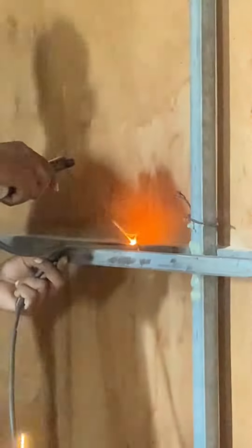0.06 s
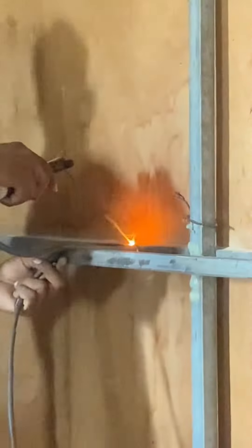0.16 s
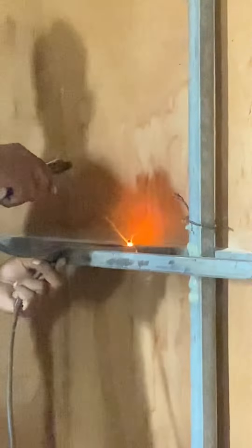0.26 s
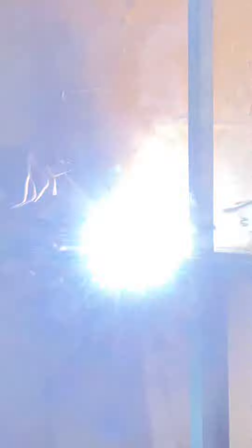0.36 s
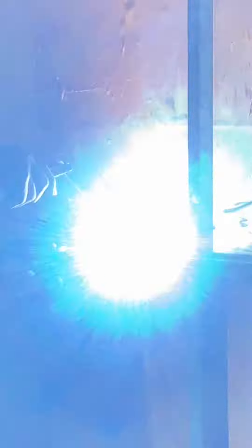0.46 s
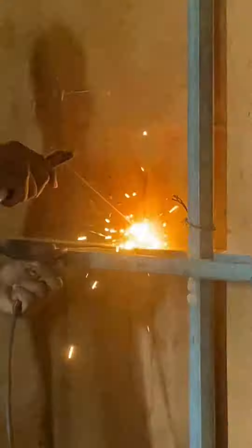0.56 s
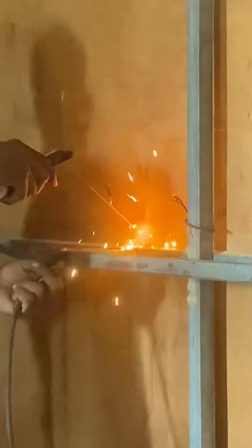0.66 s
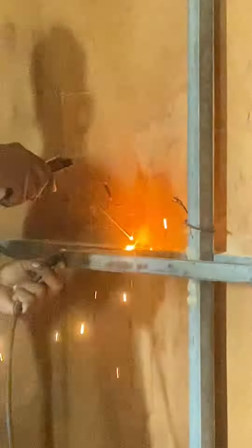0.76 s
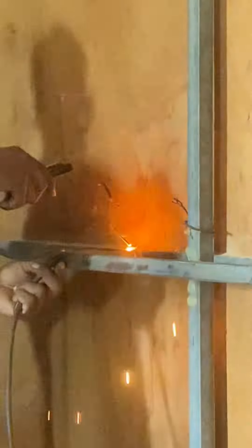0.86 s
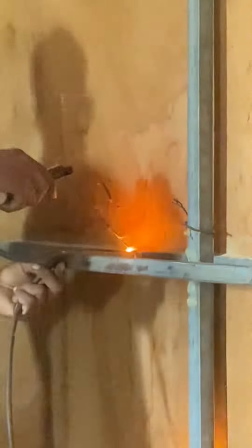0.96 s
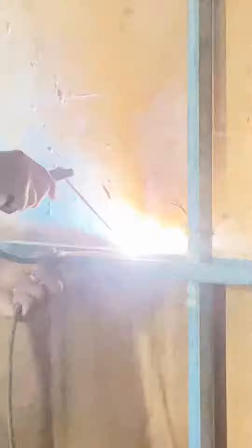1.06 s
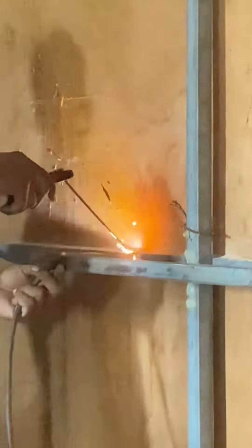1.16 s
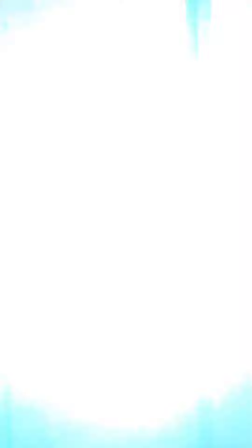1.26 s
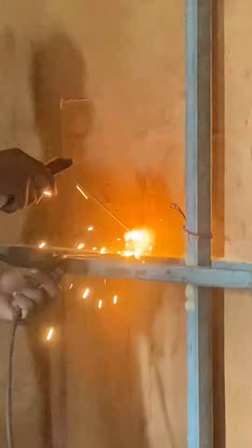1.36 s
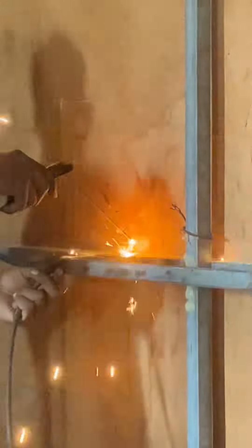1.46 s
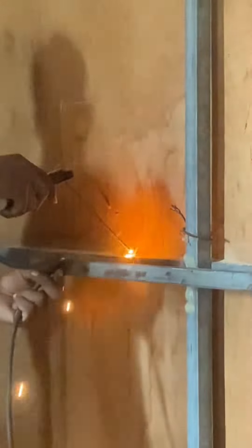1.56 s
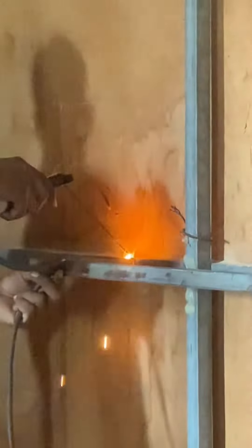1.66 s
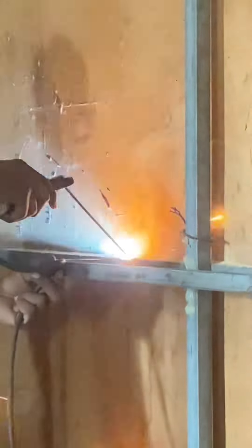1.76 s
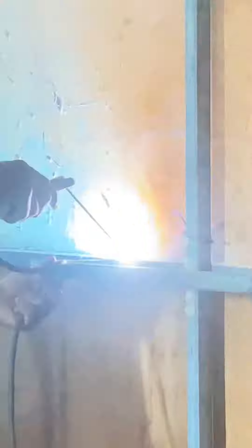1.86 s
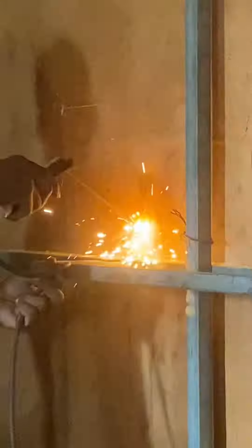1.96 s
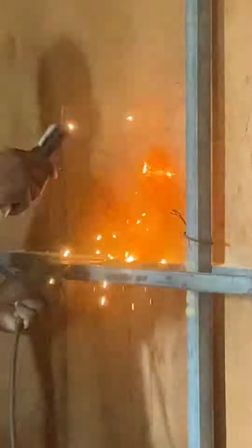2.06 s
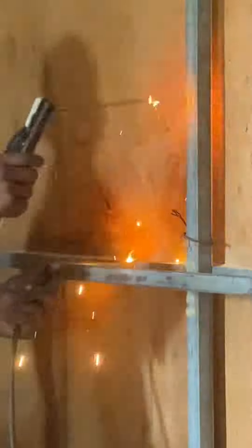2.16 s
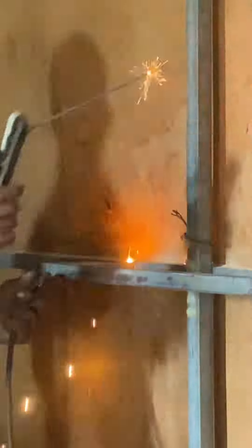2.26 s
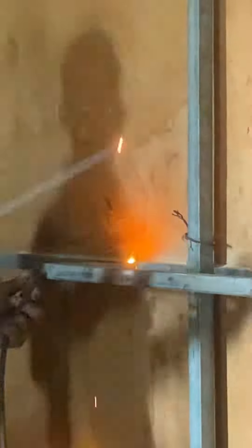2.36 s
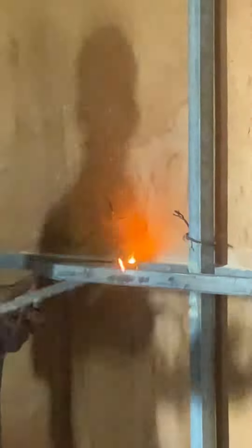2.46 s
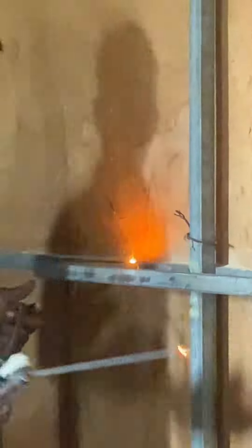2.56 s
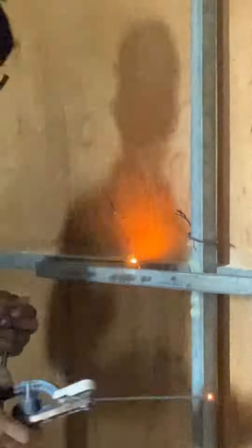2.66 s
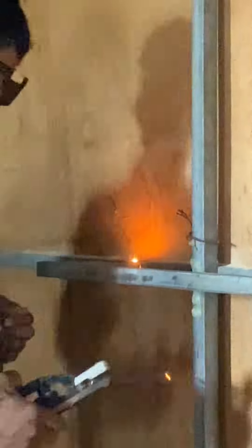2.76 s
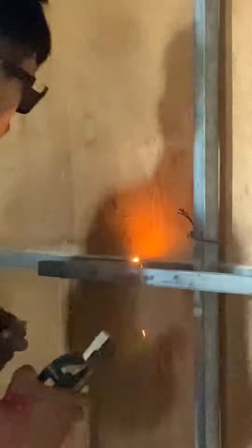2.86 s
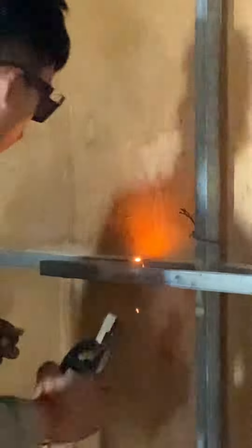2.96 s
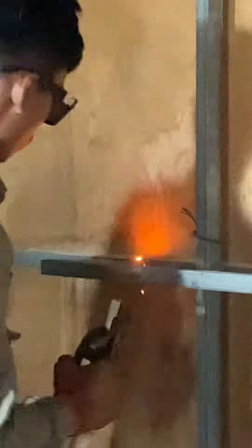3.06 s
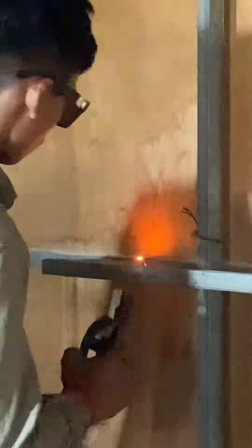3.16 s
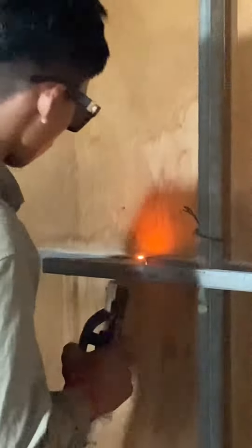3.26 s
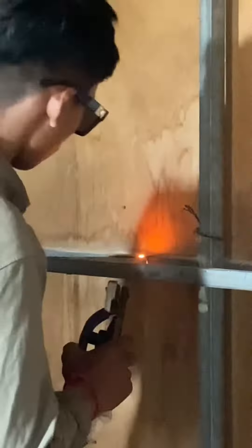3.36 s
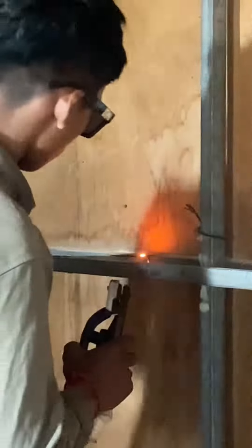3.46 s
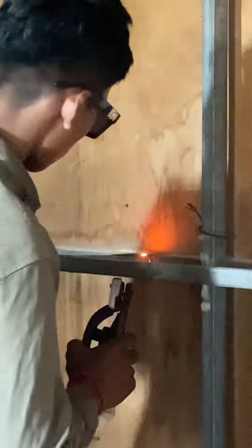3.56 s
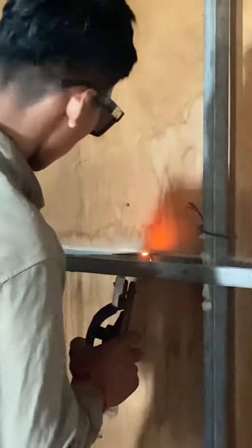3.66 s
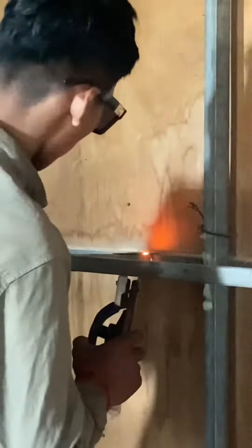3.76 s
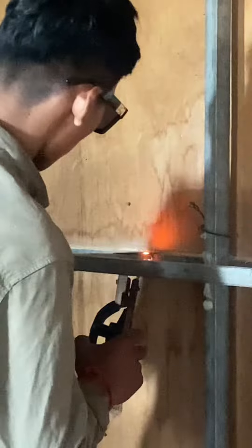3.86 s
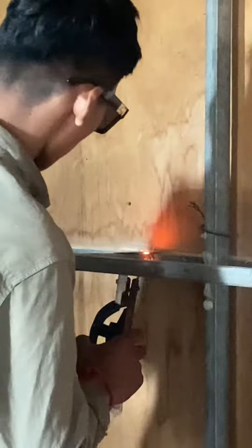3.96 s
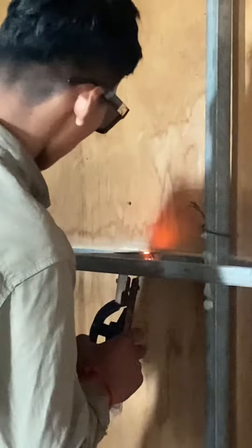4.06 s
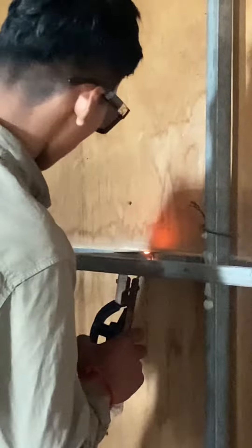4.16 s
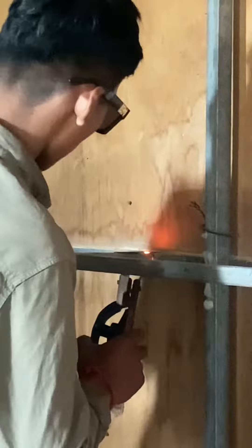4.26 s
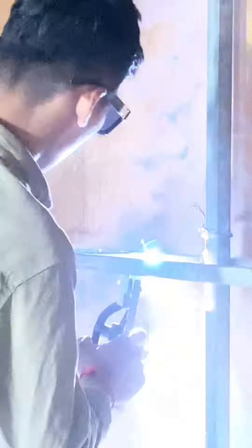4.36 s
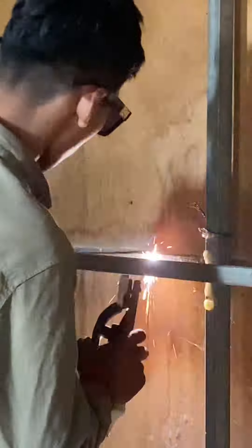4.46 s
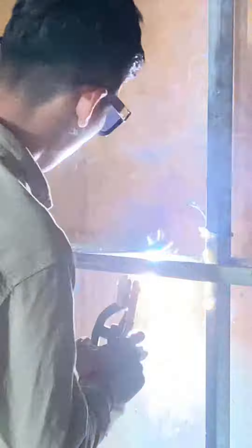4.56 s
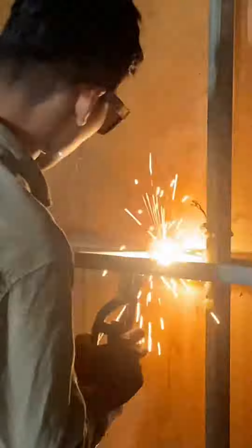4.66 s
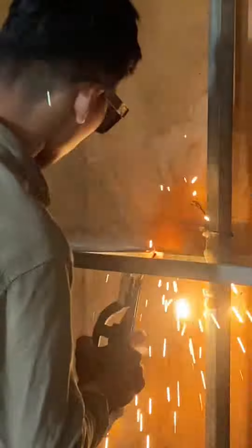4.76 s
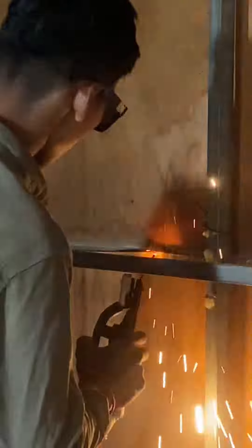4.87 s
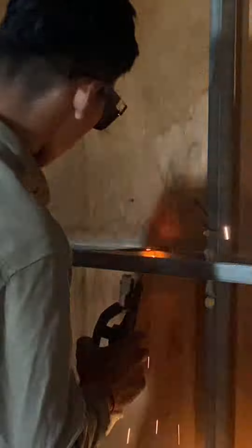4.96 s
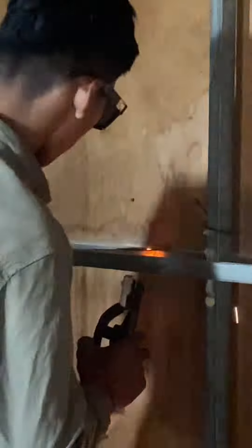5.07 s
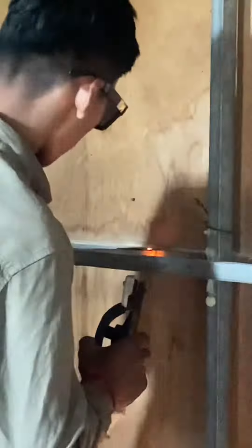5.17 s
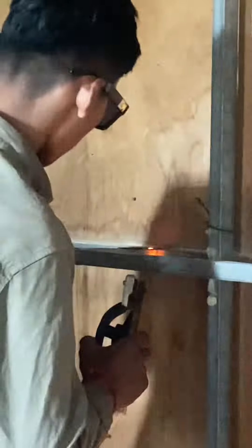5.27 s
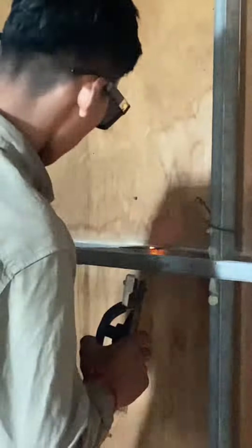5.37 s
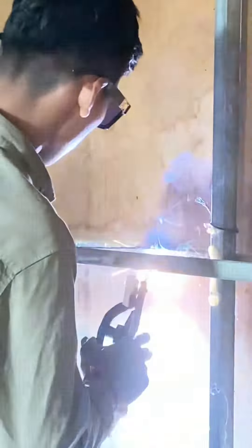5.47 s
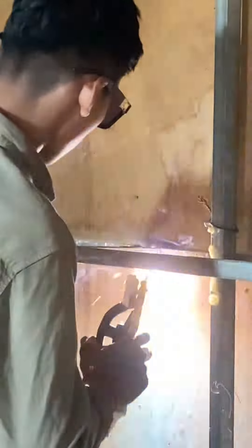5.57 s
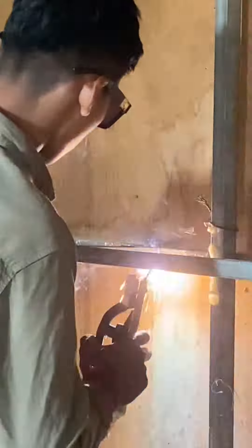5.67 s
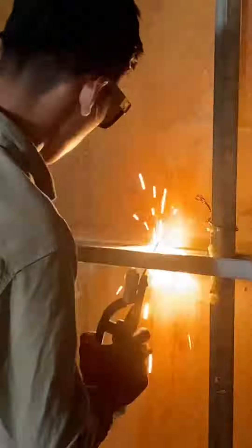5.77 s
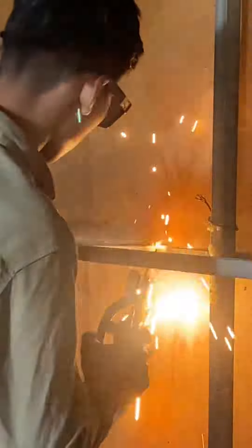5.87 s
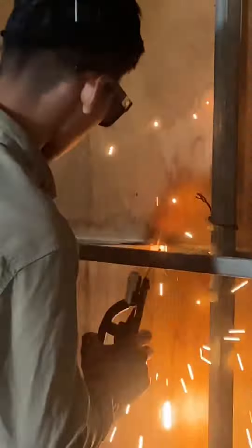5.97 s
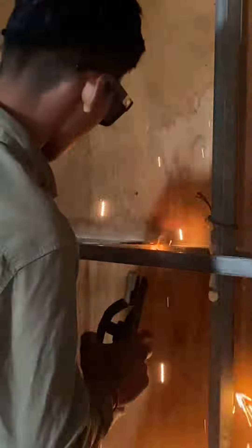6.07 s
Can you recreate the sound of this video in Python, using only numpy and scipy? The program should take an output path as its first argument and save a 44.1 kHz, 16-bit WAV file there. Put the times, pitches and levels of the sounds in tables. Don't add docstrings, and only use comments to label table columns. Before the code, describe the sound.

Close stick welding on a steel frame, captured on a phone in a reverberant hall. Brief crackling, sizzling bursts overlap far sheet metal crashes with a long washy ring. Next come soft heavy thumps, thin steel scrapes and a wavering squeak over a wobbling low hum. Late on, hard rod taps, a very sharp arc spit, one bright bar clang, then several more fizzing strikes with knocks and rubbing steel.

```python
import sys
import numpy as np
from scipy import signal
from scipy.fft import rfft, irfft
from scipy.io import wavfile
from scipy.ndimage import uniform_filter1d

SR = 44100
rng = np.random.default_rng(int(sys.argv[2]) if len(sys.argv) > 2 else 0)


def boost(x):
    u = np.asarray(x, float) / 20
    return 10 ** u


def inscribe(sig):
    pcm = np.round(np.clip(np.atleast_2d(sig).T, -1, 1) * 32767)
    wavfile.write(sys.argv[1], SR, pcm.astype(np.int16))


N = 269892
TIME = np.arange(N) / SR


def rms_one(x):
    return x / np.sqrt(np.mean(x ** 2) + 1e-20)


def in_time(rows):
    s, *columns = np.transpose(rows)
    return [np.interp(TIME, s, column) for column in columns]


def at_hz(points, hz):
    points_hz, values = np.transpose(points)
    return np.interp(np.log(hz), np.log(points_hz), values)


def drift(rate):
    r = np.exp(-80 * np.pi * rate / SR)
    steps = rng.standard_normal(N // 40 + 2002)
    slow = signal.lfilter([1], [1, -2 * r, r * r], steps)[2000:]
    return np.interp(np.arange(N) / 40, np.arange(len(slow)), rms_one(slow))


def butter(x, order, hz, kind="low"):
    return signal.sosfilt(signal.butter(order, hz, kind, fs=SR, output="sos"), x)


def resonate(x, hz, width_hz):
    r = np.exp(-np.pi * width_hz / SR)
    top = np.array([1, 0, -1]) * (1 - r * r) / 2
    return signal.lfilter(top, [1, -2 * r * np.cos(2 * np.pi * hz / SR), r * r], x)


def dying(s, t60, rise):
    out, start = np.zeros(N), int(s * SR) + 1
    t = np.arange(start, min(N, start + int(t60 * SR))) / SR - s
    out[start:start + len(t)] = (1 - np.exp(-t / max(rise, 1e-4))) * np.exp(-np.log(1000) * t / t60)
    return out


def tent(s, before, after):
    return np.interp(TIME, [s - abs(before), s, s + abs(after)], [0, 1, 0])


def coloured(tone, source, shape=lambda hz: 1):
    lowest, span = tone[0][0], tone[-1][0] / tone[0][0]
    edges = lowest * span ** np.linspace(0, 1, round(3.5 * np.log2(span)) + 1)
    centres = np.sqrt(edges[1:] * edges[:-1])
    gains = boost(at_hz(tone, centres))
    gains = gains / np.sqrt(np.sum(gains ** 2 * np.diff(edges)) * 2 / SR)
    out = 0
    for k, hz in enumerate(centres):
        band = butter(source[k % len(source)], 2, edges[k:k + 2], "band")
        out = out + gains[k] * shape(hz) * band
    return out


# strike in seconds, length in seconds,
# level at the strike in dB, change in dB while it lasts.
ARC_BURNS = [(0.282, 0.095, -37.5, -9), (0.376, 0.013, -39, -1), (0.411, 0.28, -33.5, -24.5),
             (1.055, 0.02, -44, -4), (1.082, 0.081, -52, 9), (1.163, 0.28, -35, -34),
             (1.483, .024, -29, -22), (1.711, 0.089, -44, 7), (1.81, 0.078, -47, 16.5),
             (1.911, 0.098, -46, -12), (4.121, 0.2, -47, -10), (4.321, 0.096, -28, -5.5),
             (4.406, 0.11, -34, -2), (4.522, 0.039, -38, 13.5), (4.96, .05, -56, -9),
             (5.032, 0.041, -54, -15), (5.126, .05, -61, -4), (5.411, .16, -32, -4),
             (5.574, 0.098, -37.5, 6.5), (5.688, 0.024, -28, -7), (5.72, 0.16, -43, -12),
             (5.859, 0.076, -46.5, -7)]
# start in seconds, peak in dB, snap over the peak in dB.
ARC_SPITS = [(0.376, -27, 7), (0.403, -18, 4), (0.412, -19.5, 15), (0.4434, -35, 7), (1.0507, -31, 11),
             (1.475, -35, 15), (1.713, -38, 13), (1.741, -25, 7), (1.7984, -36, -2), (3.8395, -32, 9.5),
             (4.114, -31, 6), (4.315, -4, -12), (4.448, -23, 21), (4.5438, -26, 7), (5.4049, -9.5, -1),
             (5.497, -21, 13), (5.565, -22, 16), (5.648, -15.5, 11), (5.68, -19.5, 22.5)]
# frequency in Hz, level in dB per Hz.
ARC_COLOUR = [(900, 6.5), (2000, -0.5), (4500, 1), (7000, 4.5), (10000, -2.5), (13000, -1), (15000, -7),
              (17000, -2)]


def arc():
    strike_db_per_s, quench_db_per_s = 2500., 805
    burns = []
    for s, length, db, change_db in ARC_BURNS:
        burning_db = db + change_db * np.clip((TIME - s) / length, 0, 1)
        before_db = strike_db_per_s * np.maximum(s - TIME, 0)
        after_db = quench_db_per_s * np.maximum(TIME - s - length, 0)
        burns.append(burning_db - before_db - after_db)
    level = uniform_filter1d(boost(np.max(burns, axis=0)), size=60)

    sizes = boost(1.8 * np.minimum(rng.exponential(1, N), 5)) * rng.choice([-1, 1], N)
    grains = rms_one(sizes * (rng.random(N) < 2500. / SR))
    hiss = rng.standard_normal((2, N))
    burn = (.5 * grains + 0.89 * hiss) * level * boost(5.5 + 2.0 * drift(24))
    snaps = np.zeros(N)
    for s, db, snap_db in ARC_SPITS:
        burn = burn + boost(db - 6.0) * dying(s - .001, 0.021, 0.00014) * hiss
        snaps += boost(db + snap_db) * dying(s - .0002, .0025, .00005) * np.sign(hiss[0])
    return coloured(ARC_COLOUR, burn) + butter(snaps, 2, 6000., "high")


# start in seconds, level in dB, rise in seconds,
# brightness in dB per octave, ring length as a share of the hall's.
SHEET_CRASHES = [(0.226, -16, 0.017, 1, 1.16), (.28, -12, 0.081, 0, 0.71), (0.502, -17.5, 0.043, -1, 0.93),
                 (1.146, -12, 0.012, 1.5, 0.92), (1.19, -18, 0.069, 0, 3.4), (1.424, -28, 0.005, -2, 0.6),
                 (0.792, -30.5, 0.005, -4, 0.45), (1.473, -20, 0.0059, 0.5, 1.8),
                 (1.50, -22.5, 0.024, 2, 2.8), (1.523, -19.5, 0.0061, -2, 0.49),
                 (1.586, -19, 0.0044, -4, 0.5), (1.645, -24, 0.005, -3, 0.4), (1.831, -38, 0.005, 4, 0.27)]
# frequency in Hz, level in dB per Hz.
WASH_COLOUR = [(180, -5), (350, 0.5), (630, -6), (720, 0.5), (1050, -2), (1250, -7), (2000, -17.5),
               (3400, -10.5), (6000, -17.5), (8500, -22.5), (11000, -36.5), (12800, -29)]
# frequency in Hz, time in seconds to fall 60 dB.
WASH_T60 = [(250, 0.26), (900, 1.69), (2500, 1.71), (5000, 0.37), (8000, 0.39), (12000, 0.55)]
# frequency in Hz, level in dB over the wash.
SHEET_MODES = [(335, -5), (452, -1), (731, -1), (767, 2.5), (823, 2), (890, 1.5), (964, 3), (1007, 1.5),
               (1041, 5), (1134, -26), (1347, 9.5), (1416, 5), (1545, 7.5), (1570, 7.5), (1810, 10),
               (1949, 8.5), (2306, 2), (2433, -26), (2713, 5), (2800, -13), (3004, 4), (3165, 2.5),
               (3420, 3), (3607, -5)]
# end in seconds, start in seconds,
# extra fall in dB per second.
SHEET_DAMPS = [
    (1.0, 0.79, 7),
    (7.0, 1.59, 9.5),
]


def crashes():
    def energy(hz):
        tilt = np.log2(hz / 1000)
        slow = max((1000 / hz) ** 0.17, .1)
        power = 0
        for s, db, rise, bright, share in SHEET_CRASHES:
            if hz >= 7000:
                share = min(share, 2.2)
            envelope = dying(s, share * at_hz(WASH_T60, hz), rise * slow)
            power = power + (boost(db + bright * tilt) * envelope) ** 2
        return np.sqrt(power)

    damp_db = 0
    for until, s, db in SHEET_DAMPS:
        damp_db = damp_db - db * np.maximum(TIME - s, 0) * (TIME < until + .14)
    damp = boost(damp_db)

    def wash_level(hz):
        grip = 1 + .7 * abs(np.log2(hz / 950))
        return energy(hz) * damp ** grip * boost(2.47 * drift(10.3))

    white = rng.standard_normal((3, N))
    clatter_per_s, clatter_share = 900., 0.55
    ticks = rms_one(white[2] ** 3 * (np.abs(white[1]) < 1.25 * clatter_per_s / SR))
    source = np.sqrt(1 - clatter_share ** 2) * white[:2] + clatter_share * ticks
    wash = coloured(WASH_COLOUR, source, wash_level)

    low = boost(-7.0) * energy(570.0)
    high = boost(-11.0) * energy(1200.0) * damp ** 2
    rings = np.zeros(N)
    for hz, db in SHEET_MODES:
        width_hz = 8 + .004 * max(hz - 1100, 0)
        mode = rms_one(resonate(white[2], hz, width_hz))
        rings += boost(at_hz(WASH_COLOUR, hz) + db) * mode * (low if hz < 1200 else high)
    return wash + butter(rings, 4, 4500.)


# start in
# seconds, peak in dB, pitch in Hz, time in seconds to fall 60 dB.
PADDED_THUDS = [(0.433, -13, 174, 0.09), (0.444, -11, 73, 0.21), (0.969, -15.5, 197, 0.11),
                (2.03, -18, 510, 0.32), (2.056, -22, 520, 0.14), (2.071, -15, 547, 0.11),
                (2.09, -13.5, 435, 0.19), (2.19, -16, 500, 0.29), (2.61, -20, 572, 0.85),
                (2.65, -23, 631, 0.37), (2.955, -4, 67.7, 0.11), (3.019, -7.5, 594, 0.041),
                (3.021, -8, 278, 0.056), (3.018, -11, 113, 0.13), (3.838, -6, 44.8, 0.095),
                (4.573, -15.5, 120, 0.48), (4.602, -20, 198, 0.66), (4.6, -17, 550, 0.17),
                (4.625, -18.5, 145, 0.55), (4.655, -20, 169, 0.3), (4.687, -21, 307, 0.12),
                (4.76, -16, 150, 0.16), (4.43, -16.5, 357, 0.14), (4.36, -14, 400, 0.16),
                (4.469, -19, 424, 0.093)]
# start in seconds, peak in dB, pitch in Hz,
# time in seconds to fall 60 dB.
ROD_TAPS = [(4.252, -12.5, 323, 0.29), (4.275, -7.5, 258.3, 0.1), (4.298, -17, 650, 0.1),
            (4.261, -20, 1450, 0.052), (4.257, -12.5, 850, 0.083), (4.266, -16, 565, 0.1),
            (4.47, -14, 800, 0.05), (2.071, -15, 800, 0.046), (4.255, -8.5, 683, 0.096),
            (4.28, -10, 508, 0.14), (4.352, -11.5, 646, 0.17), (4.462, -11.5, 615, 0.067),
            (4.258, -11.5, 1000, 0.098), (4.256, -24, 1900, 0.05), (4.283, -28, 1900, 0.041),
            (4.315, -19, 1730, .06), (4.345, -18, 1700, .08), (4.362, -17, 790, 0.041),
            (4.466, -18, 1100, 0.053), (4.487, -14.5, 706, .08), (4.546, -15, 1180, 0.056),
            (4.562, -19, 3000, 0.066), (5.40, -25, 570, 0.12), (5.629, -21.5, 1540, 0.076),
            (5.69, -14, 548.4, 0.11), (5.703, -8.5, 262, 0.087)]


def knocks():
    out, white = np.zeros(N), rng.standard_normal(N)
    edge = rms_one(butter(butter(white, 4, [300, 3000], "band"), 1, 800.))
    # its edge in dB, its share of clear note
    for blows, edge_db, pure in [(PADDED_THUDS, -12, 0.53), (ROD_TAPS, -8, 0.54)]:
        for s, db, hz, t60 in blows:
            rise = .5 / hz
            since = np.maximum(TIME - s, 0)
            sag = 0.67 * (1 - np.exp(-since * hz / 2.8))
            note = np.sin(2 * np.pi * (hz * since + sag)) * dying(s, .35 * t60, rise)
            puff = rms_one(resonate(resonate(white, hz, 0.21 * hz), hz, 0.61 * hz))
            body = puff * dying(s, t60, rise)
            hard = boost(edge_db) * edge * dying(s, 0.25 * t60, 0.0013)
            out += boost(db) * (pure * note + 0.5 * body + .5 * hard)
    return out


# frequency in Hz, level in dB, time in seconds to fall 60 dB.
BAR_MODES = [(118.9, -12, 1.4), (1170, 5.5, 0.19), (1610, 0, 0.11), (1900, -0.5, 0.29), (2216, -10, 0.56),
             (2690, -4, 0.28), (3220, 1.5, 0.16), (3500, -10, 1.2), (3120, -33, 0.54), (3930, -15, 0.14),
             (4000, -3, 0.17), (4430, -9, 0.65), (4560, -18, 0.43), (5080, -0.5, 0.2), (5400, -16, 0.34),
             (7100, -42, 0.43)]
# delay after the blow in seconds, level in dB.
BAR_BOUNCES = [
    (0.009, 1),
    (0.023, -5),
    (0.036, -15),
    (0.047, -20),
]


def clang():
    blow_s, crack_t60_s = 4.587, .5
    white = rng.standard_normal((2, N))
    modes, rattle = np.zeros(N), np.zeros(N)
    for hz, db, t60 in BAR_MODES:
        modes += boost(db - 5.5) * rms_one(resonate(white[0], hz, 10.5)) * dying(blow_s, t60, 0.00033)
    for delay, db in BAR_BOUNCES:
        rattle += boost(db) * dying(blow_s + delay, 0.034, 0.0002)
    crack_tone = [(300, 18), (900, -38), (1200, 2.0), (2400, -1.5), (3500, 3.5), (4600, 1.5),
                  (5800, -10.5), (6600, -26), (7500, -45)]

    def crack_level(hz):
        return dying(blow_s, crack_t60_s * (3000 / hz) ** 0.17, 0.00019) + rattle

    return boost(-18) * (modes + coloured(crack_tone, white, crack_level))


# start, peak and end in
# seconds, pitch in Hz, level in dB.
STEEL_RASPS = [(1.77, 2.26, 2.53, 5300, -38.5), (2.28, 2.5, 3.4, 5200, -45.5),
               (2.1, 2.12, 2.62, 5730, -37.5), (1.96, 2.18, 2.62, 8500, -43), (2.6, 2.9, 4.7, 679, -38),
               (5.58, 5.64, 5.72, 1490, -32), (5.7, 5.798, 5.9, 164, -29.5), (2.76, 4.7, 11, 161, -39.5)]
# start, peak and end in
# seconds, pitch in Hz, level in dB.
GROANS_AND_ARC_TONES = [(2.58, 2.7, 2.85, 3550, -45), (2.98, 3.18, 3.4, 910, -39), (2.81, 3.02, 3.35, 740, -30),
                        (2.62, 3.5, 3.77, 130, -34), (5.47, 5.64, 5.68, 2550, -43), (5.41, 5.44, 6.2, 4480, -40),
                        (5.55, 5.58, 5.61, 3550, -39), (5.63, 5.68, 5.695, 4700, -36),
                        (2.08, 2.26, 2.55, 5200, -40)]
# start, peak and end in seconds, pitch in Hz, level in dB.
SQUEALS_AND_RINGS = [(2.57, 2.634, 2.9, 2250, -42), (2.6, 2.72, 2.82, 3560, -52), (2.87, 2.96, 3.25, 4860, -47),
                     (2.02, 2.13, 2.3, 3390, -45), (2.1, 2.27, 2.6, 5150, -42), (1.7, 1.9, 2.7, 1041, -36),
                     (1.7, 1.9, 2.6, 1347, -40), (1.65, 1.8, 2.1, 900, -33), (1.75, 1.9, 2.3, 1810, -43),
                     (5.4, 5.66, 5.8, 4700, -41), (3.1, 3.2, 3.4, 2950, -47)]


def scrapes():
    grit = rng.standard_normal(N) * boost(.8 * drift(34))
    out = np.zeros(N)
    for rows, width in [(STEEL_RASPS, 0.15), (GROANS_AND_ARC_TONES, 0.075), (SQUEALS_AND_RINGS, 0.016)]:
        for start, peak, end, hz, db in rows:
            rub = rms_one(resonate(resonate(grit, hz, width * hz), hz, width * hz))
            out += boost(db) * tent(peak, peak - start, end - peak) * rub
    return out


# time in seconds, pitch in Hz, level in dB rms.
SQUEAK_NOTE = [(2.86, 2990, -62), (2.93, 3010, -48), (3.0, 3000, -45), (3.05, 2920, -42.5),
               (3.09, 2980, -43.5), (3.13, 3000, -44), (3.15, 2960, -62)]


def squeak():
    hz, level_db = in_time(SQUEAK_NOTE)
    turn = 2 * np.pi * np.cumsum(hz * (1 + .004 * drift(60.))) / SR
    return np.sqrt(2) * boost(level_db + 2.5 * drift(25.)) * np.sin(turn)


# time in seconds, pitch in Hz, level in dB rms.
DRONE_SPEED = [(0.0, 54.5, -18), (0.34, 54.6, -30), (0.46, 57.3, -26), (0.6, 54.75, -29.5),
               (1.46, 55.33, -29), (1.7, 55.2, -24), (2.18, 55.06, -28), (2.74, 55.2, -29.5),
               (2.95, 53.5, -27.5), (3.75, 53.58, -23.5), (3.92, 56.5, -17), (4.07, 58.5, -27),
               (4.55, 58.43, -21), (5.03, 55.75, -24), (5.36, 55, -23.5), (5.6, 56, -31.5),
               (5.9, 57.7, -23.5), (6.12, 55.9, -30.5)]
# middle in seconds,
# half length in seconds, depth in dB.
DRONE_NULLS = [(0.104, 0.2, 14), (0.402, 0.032, 18), (1.088, 0.11, 22), (1.87, 0.06, 18), (1.932, 0.14, 24),
               (2.294, 0.06, 8), (3.173, 0.27, 11), (3.607, 0.12, 6), (5.73, 0.13, 19)]
# start, peak and end in seconds (a start put after
# the peak counts as equally far before it), multiple of the pitch, level in dB rms.
DRONE_OVERTONES = [(4.76, 5.2, 5.5, 1.5, -34.5), (4.47, 4.65, 5.05, 2.02, -28),
                   (4.95, 5.47, 5.81, 2.5, -34.5), (4.6, 5.05, 5.48, 3.01, -33),
                   (5.51, 5.8, 6.1, 2.9, -32.5), (5.7, 5.9, 6.3, 1.98, -33), (6.4, 5.57, 5.7, 5.01, -38)]


def drone():
    hz, level_db = in_time(DRONE_SPEED)
    for s, half, depth_db in DRONE_NULLS:
        level_db = level_db - depth_db * np.minimum(1.1 * tent(s, half, half), 1)
    turn = 2 * np.pi * np.cumsum(hz * (1 + 0.00743 * drift(25.7))) / SR
    out = np.sqrt(2) * boost(level_db + 1.1 * drift(6.3)) * np.sin(turn)
    for start, peak, end, multiple, db in DRONE_OVERTONES:
        swell = tent(peak, peak - start, end - peak) ** .5
        out += np.sqrt(2) * boost(db) * swell * np.sin(multiple * turn)
    return out


# time in seconds, level in dB against its mean.
HALL_ACTIVITY = [(0.0, 0), (0.49, 4.5), (0.82, 0), (1.06, 1.9), (1.41, 1), (1.8, 0), (1.92, -1.5),
                 (2.05, 0.8), (3.95, 0.3), (4.64, 1), (5.45, -0.1), (6.12, 0.7)]
# peak in seconds, lift in dB.
HALL_BRIGHTENINGS = [
    (0.49, 7.6),
    (1.41, 8.4),
]
# frequency in Hz, level in dB per Hz.
HALL_COLOUR = [(25, -21), (50, -5.5), (90, -8.5), (170, -12), (340, -12), (840, -19.5), (1500, -24),
               (2250, -28.5), (2900, -28.5), (3500, -33), (5000, -36), (6500, -47.5), (9000, -87),
               (12000, -109), (15500, -83)]
# frequency in Hz, width in Hz, level in dB rms.
DUCT_RINGS = [(120, 50, -40), (278.6, 5.7, -37), (335, 12.6, -34), (427.5, 1.9, -41), (546, 12, -53),
              (1101, 33, -39.5), (1713, 5.2, -54), (2308, 11, -51.5)]


def hall():
    low_db, = in_time(HALL_ACTIVITY)
    high_db = 1.0
    for s, db in HALL_BRIGHTENINGS:
        high_db = high_db + db * tent(s, 0.34, 0.41)

    def level(hz):
        share = np.clip(np.log2(hz / 200.0) / 3.4, 0, 1)
        fade = np.clip(np.log2(8240 / hz), 0, 1)
        return boost(-30.0 + (1.0 - share) * low_db + share * fade * high_db + 2.1 * drift(6.4))

    white = rng.standard_normal((3, N))
    out = coloured(HALL_COLOUR, white[:2], level)
    for hz, width, db in DUCT_RINGS:
        out += boost(db) * rms_one(resonate(white[2], hz, width))
    whine_hz, whine_from_s = 1190, 2.9
    whine = rms_one(resonate(resonate(white[2], whine_hz, 25.), whine_hz, 25.))
    return out + boost(-41.5) * whine * np.clip(TIME - whine_from_s, 0, .3) / .3


def room(x, t60, cut_hz):
    t = np.arange(SR) / SR
    white = rng.standard_normal(SR)
    dull = butter(white, 1, cut_hz) * boost(-60 * t / t60)
    bright = 0.69 * white * boost(-60 * t / (0.25 * t60))
    tail = (dull + bright) * (t > .008)
    tail = butter(tail, 8, 10000)
    return signal.fftconvolve(x, tail / np.sqrt(np.sum(tail ** 2)))[:N]


def scene():
    near = arc() + knocks() + clang()
    far = boost(-11.5) * room(near, t60=1.0, cut_hz=4200) + crashes() + scrapes() + squeak() + hall()
    dulled = butter(far, 10, 12600)
    mono = near + dulled + boost(-27.5) * (far - dulled) + drone()
    return np.array([mono, mono])


def roll_off(x):
    return signal.sosfilt(signal.butter(12, 16960, fs=SR, output="sos"), x)


# frequency in Hz, half turns between them,
# likeness from -1 to 1, left over right in dB.
PORT_PHASES = [(0, 0, 1, 0), (120, 0, .998, 0), (190, .03, .975, -.5), (300, .06, .94, .5),
               (480, .1, .55, -2), (700, .1, -.35, -4.5), (1300, 0, -.25, -2), (1750, 0, .6, -1.5),
               (2300, 0, .99, 0), (5400, 0, 1, 0)]
# from in Hz, to in Hz.
PHASE_SLIPS = [(5450, 6900), (7750, 9700), (11400, 13200), (14100, 15900)]


def record(dry):
    hz = np.fft.rfftfreq(N, 1 / SR)
    port_hz, *columns = np.transpose(PORT_PHASES)
    turns, alike, lean_db = (np.interp(hz, port_hz, column) for column in columns)
    slips = np.array([np.clip((hz - low) / (high - low), 0, 1) for low, high in PHASE_SLIPS])
    turns = turns - slips.sum(axis=0)
    blur = .04 * (np.sin(np.pi * slips[:-1]) ** 2).sum(axis=0)
    alike = np.clip(alike - 0.003 * slips[0] - blur, -1, 1)

    smear = rng.standard_normal(8000) * np.exp(-np.arange(8000) / (.06 * SR))
    scramble = rfft(smear / np.sqrt(np.sum(smear ** 2)), N)
    scramble = scramble / np.sqrt(uniform_filter1d(np.abs(scramble) ** 2, size=500))
    direct, diffuse = np.sqrt((1 + alike) / 2), np.sqrt((1 - alike) / 2) * scramble
    turn = np.exp(-.5j * np.pi * turns) * boost(lean_db / 2)
    ports = irfft(rfft(dry) * [(direct + diffuse) * turn, (direct - diffuse) / turn], N)

    sway = 0.05 * drift(9.0)
    ports = ports + sway * np.gradient(ports, axis=1) * [[1], [-1]]
    ports = signal.sosfilt(signal.cheby2(24, 44, 15900, fs=SR, output="sos"), ports)
    mix = np.clip(ports, -1, 1)
    return roll_off(mix)


dry = scene()
out = record(dry)
inscribe(out)
```